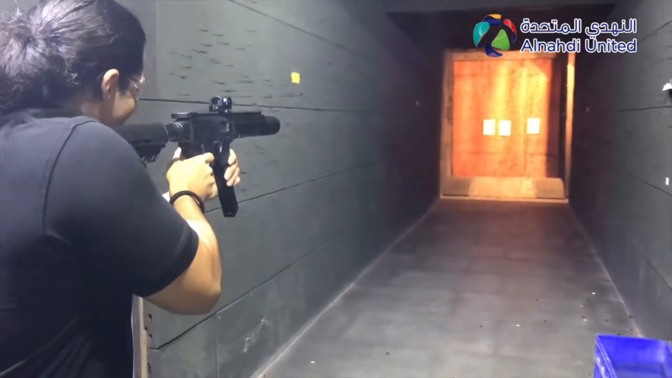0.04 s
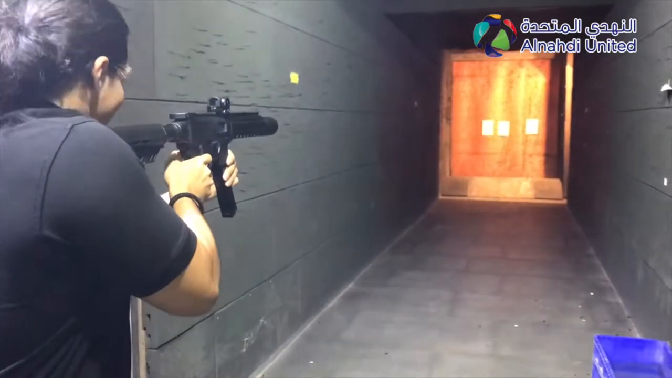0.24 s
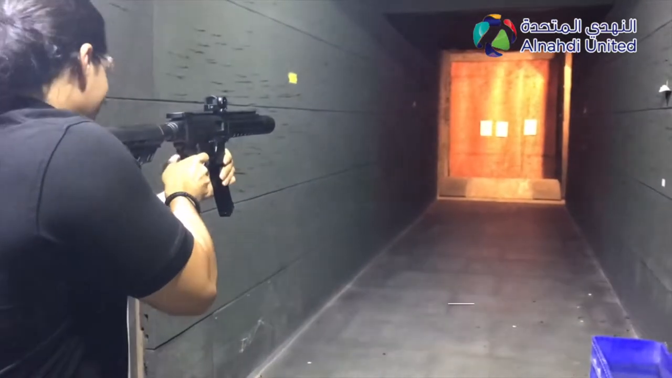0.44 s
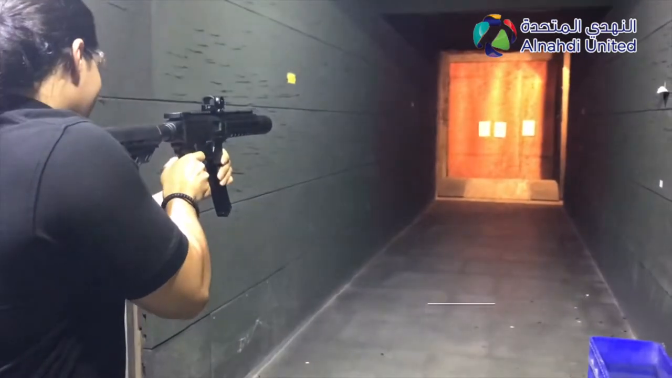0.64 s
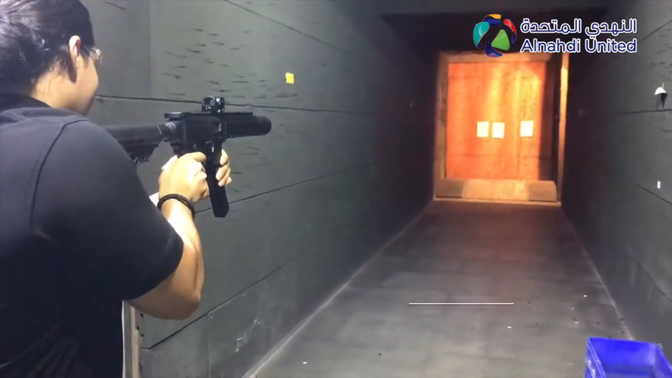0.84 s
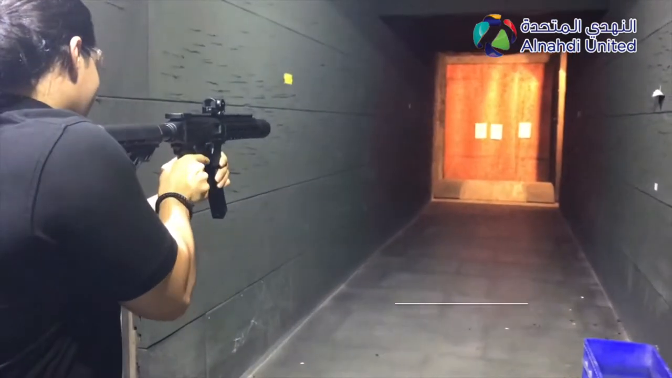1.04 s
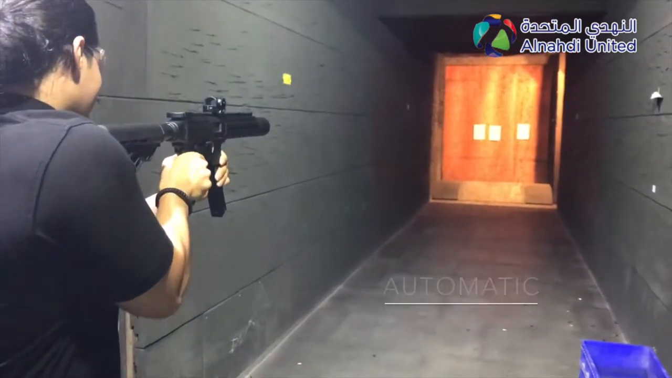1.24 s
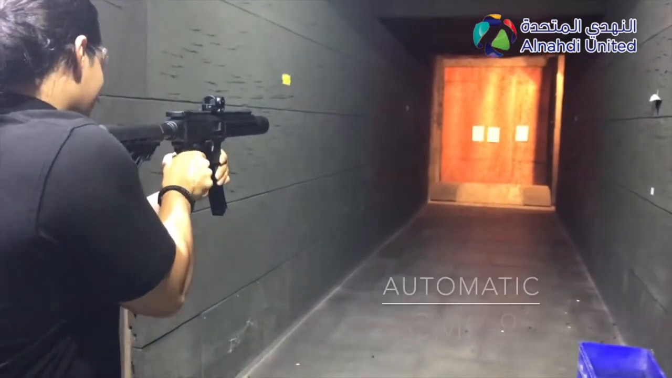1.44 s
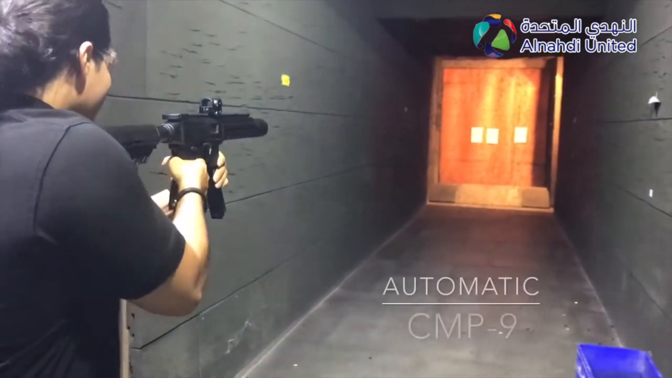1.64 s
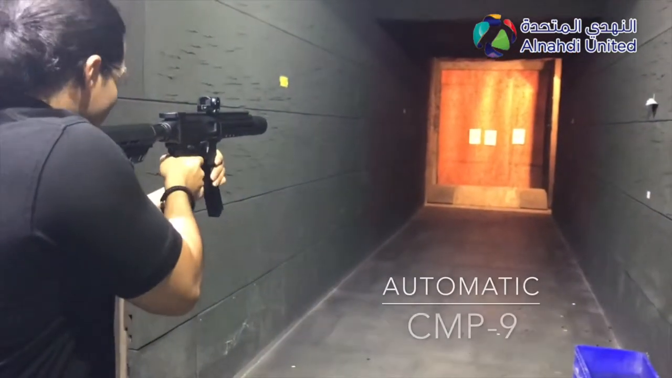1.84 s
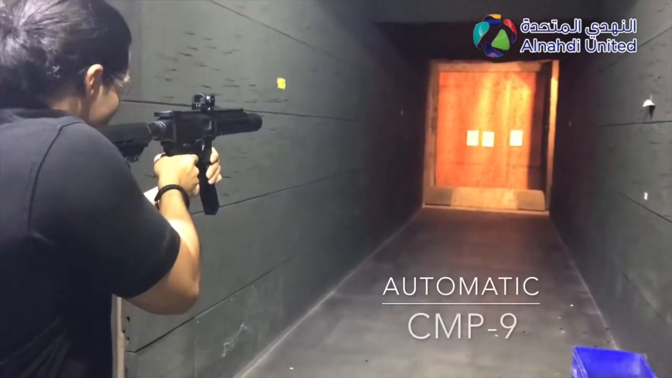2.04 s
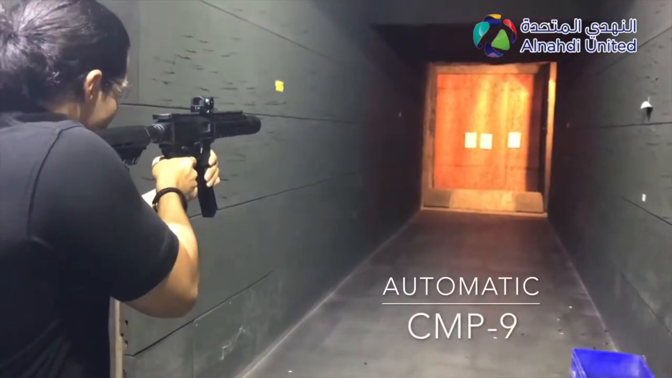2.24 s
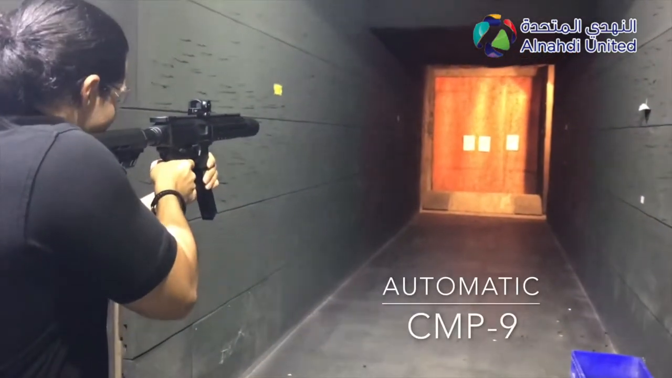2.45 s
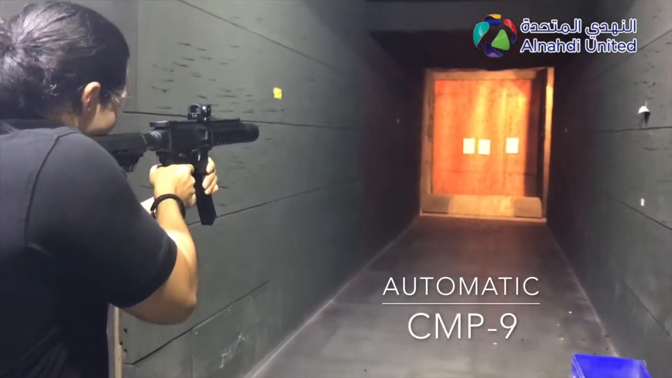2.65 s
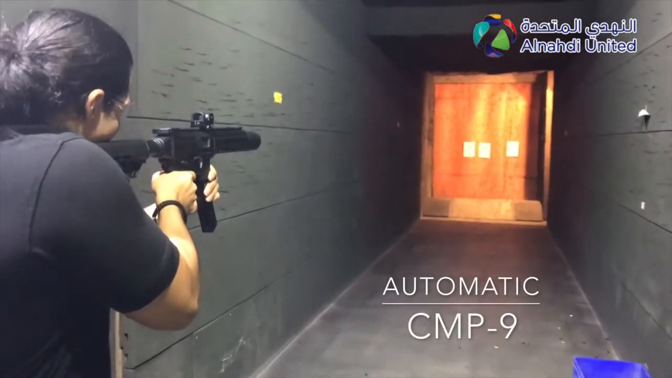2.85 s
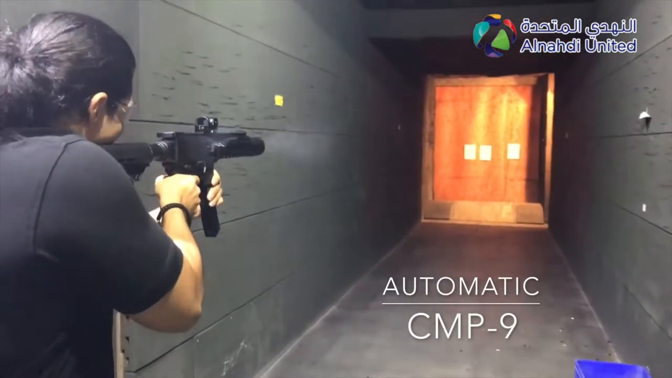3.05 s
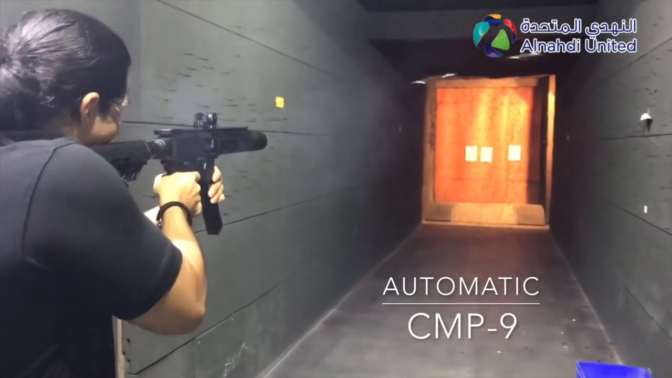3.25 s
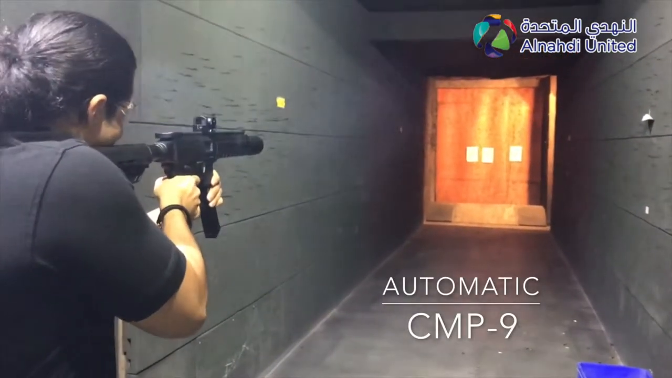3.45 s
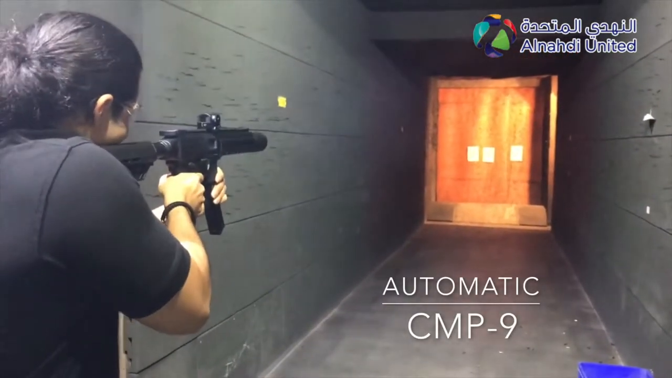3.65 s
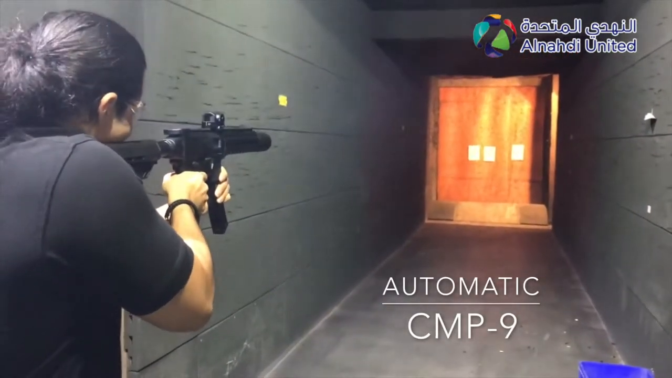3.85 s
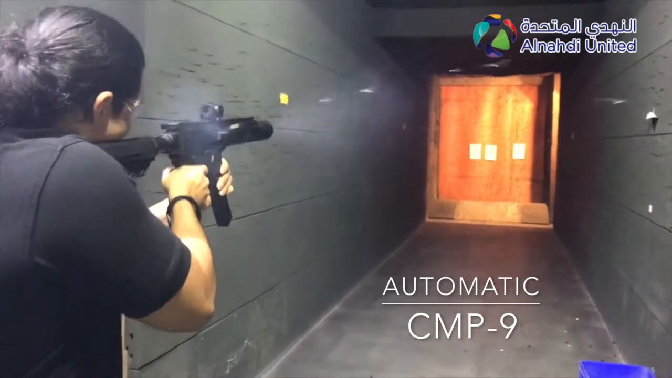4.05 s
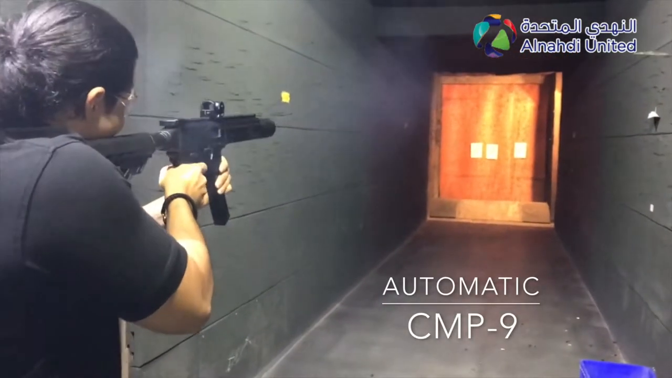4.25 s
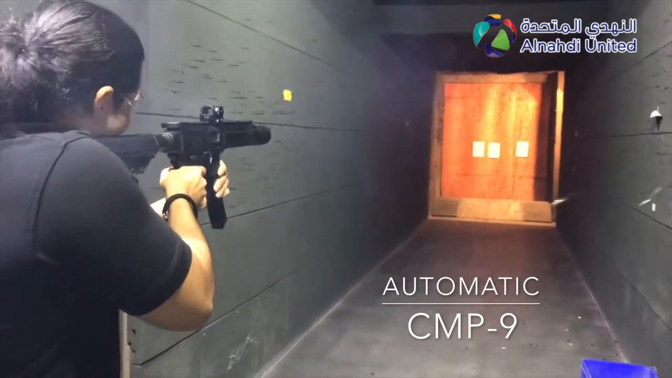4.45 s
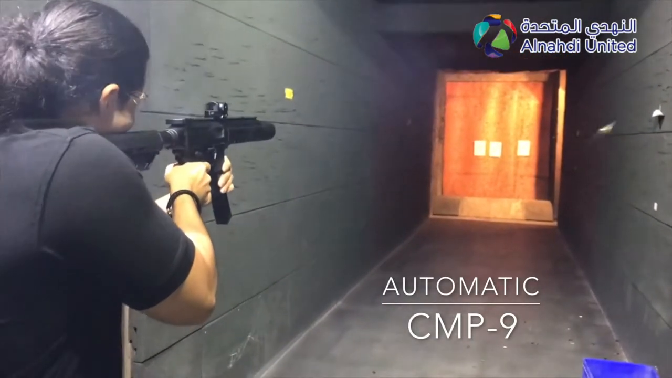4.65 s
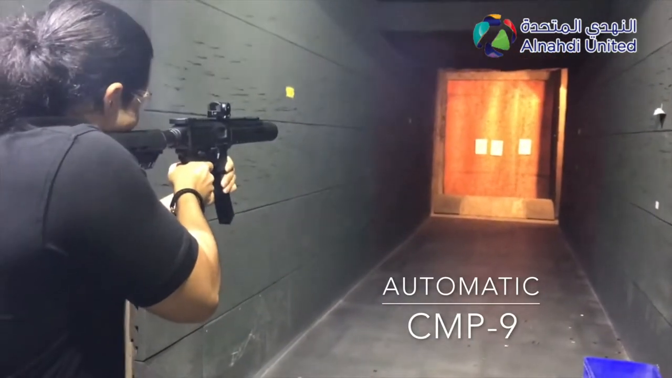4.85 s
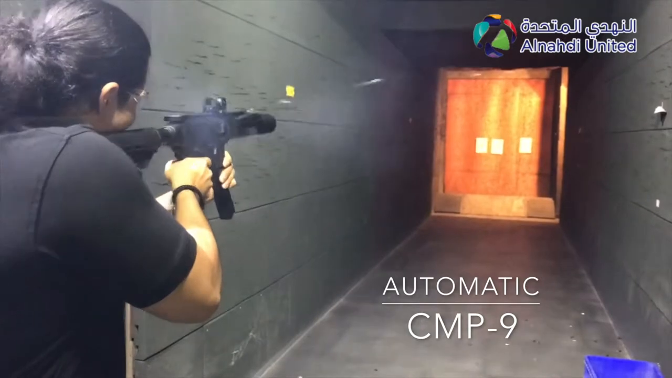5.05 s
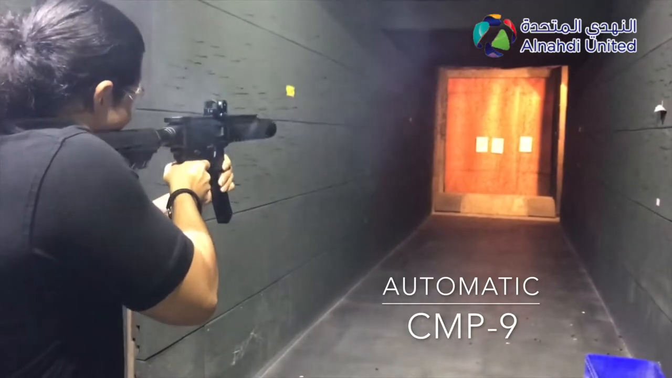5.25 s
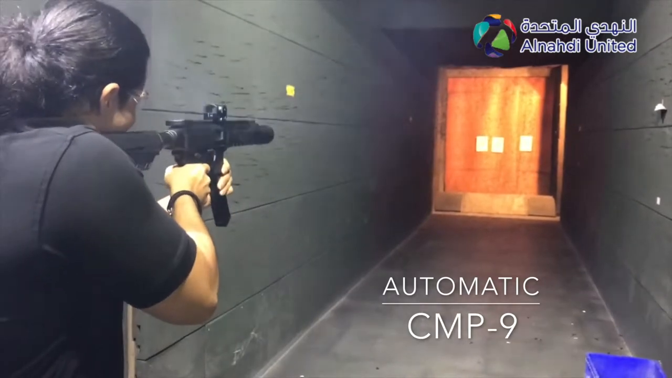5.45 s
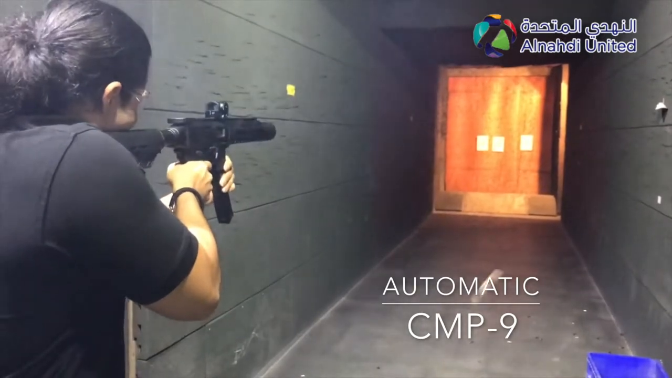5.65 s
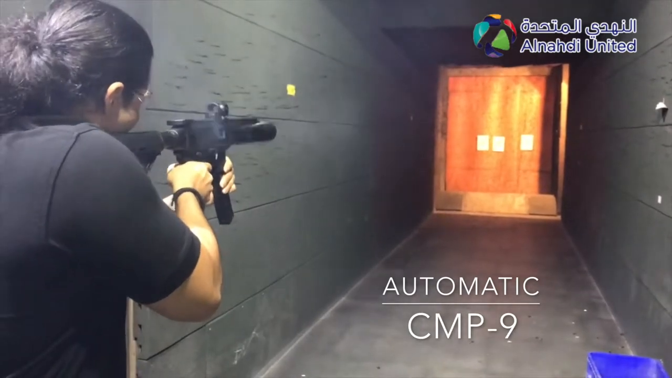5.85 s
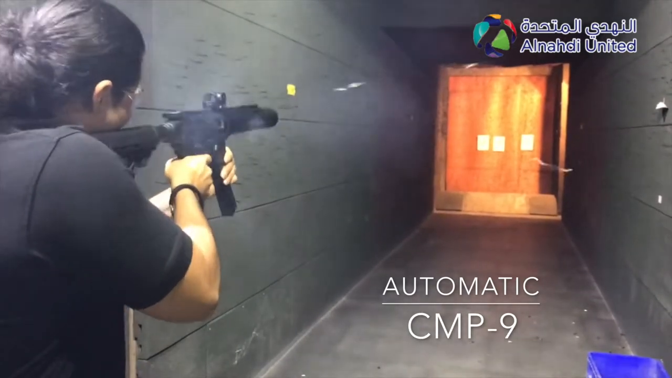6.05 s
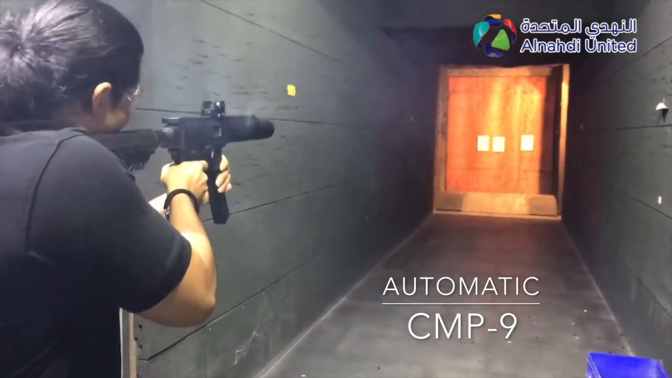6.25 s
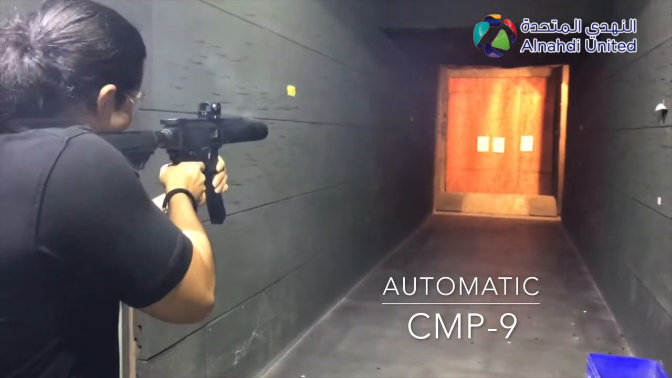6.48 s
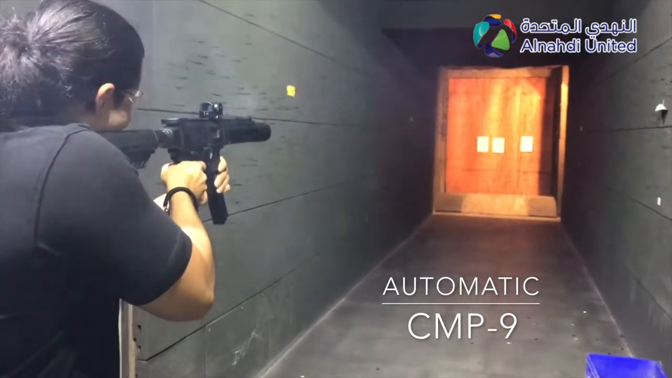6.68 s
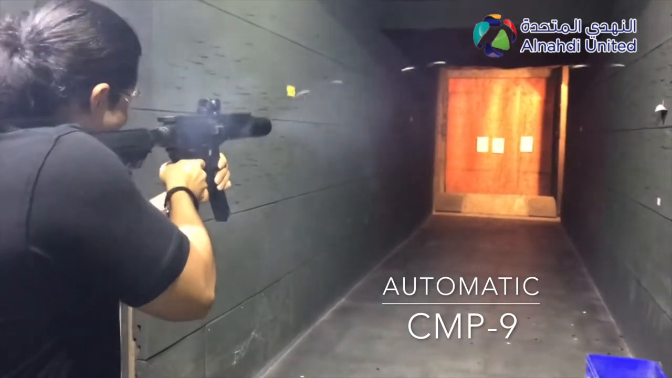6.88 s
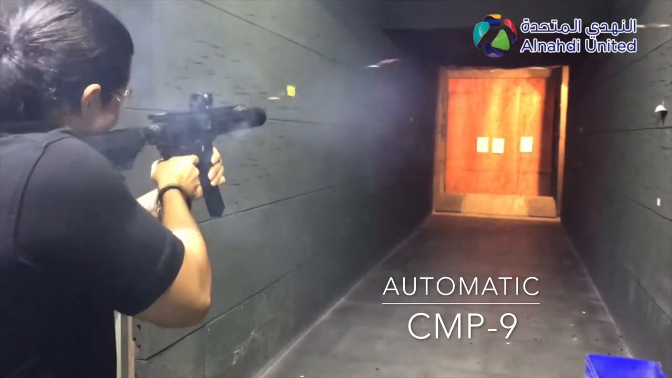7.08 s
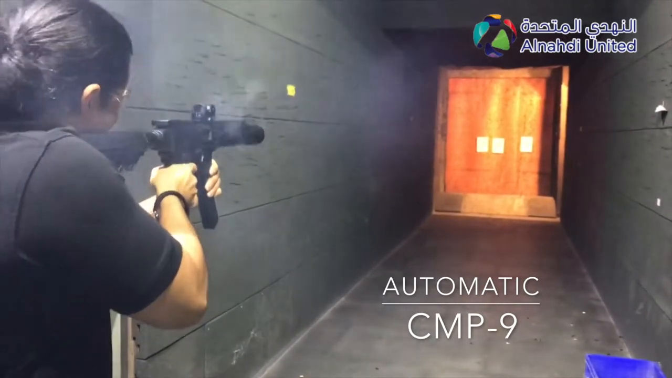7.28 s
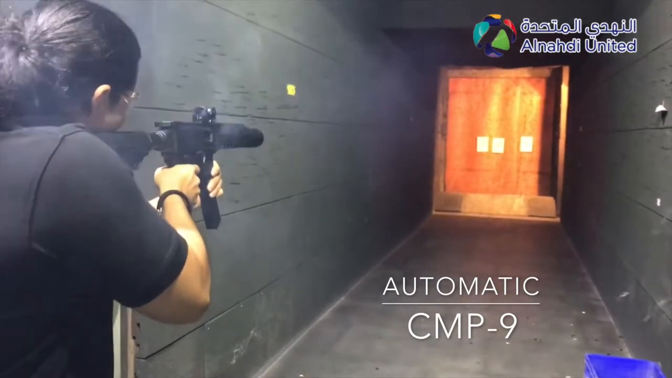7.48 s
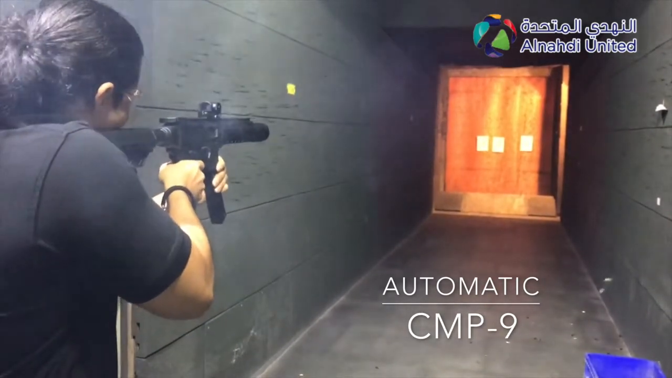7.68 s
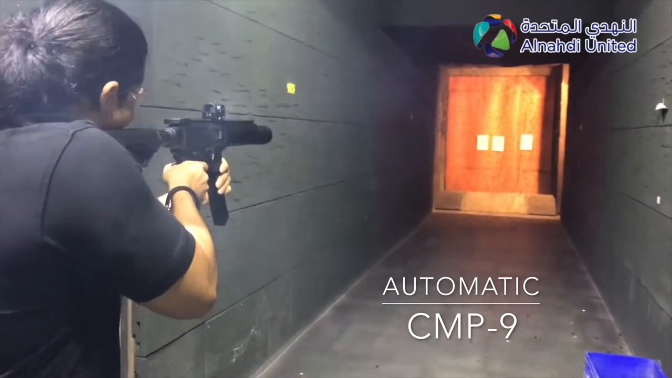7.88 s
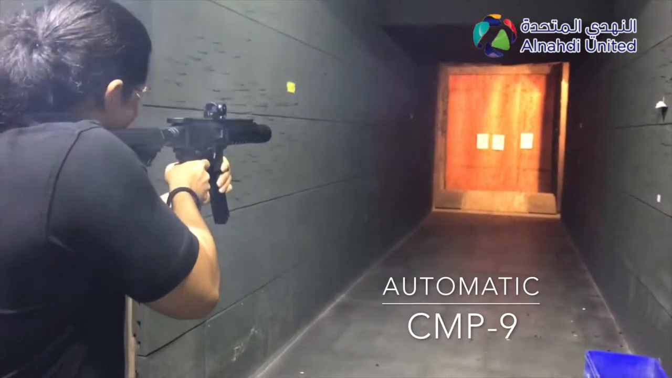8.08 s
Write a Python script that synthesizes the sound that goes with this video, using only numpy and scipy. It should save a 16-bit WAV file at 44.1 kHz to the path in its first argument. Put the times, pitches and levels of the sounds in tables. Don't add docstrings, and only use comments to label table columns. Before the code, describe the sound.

Close to the camera, a lumpy fan rumble with faint duct hiss and sparse metallic clicks. From about three seconds, a suppressed gun fires five tight bursts roughly a second apart, the last one longest. Each is crisp, hissy and mid-heavy, with short hard-walled reverberation and thin ringing metal. After every burst the ambience is ducked and slowly recovers; light handling clicks finish.

```python
import sys
import numpy as np
from scipy import signal
from scipy.fft import rfft, irfft, next_fast_len
from scipy.io import wavfile
from scipy.ndimage import map_coordinates

SR = 44100
rng = np.random.default_rng(int(sys.argv[2]) if len(sys.argv) > 2 else 0)


def ratio(d):
    e = np.asarray(d, float) / 20
    return 10 ** e


def master_out(mix):
    frames = np.transpose(np.atleast_2d(mix))
    ceiling = np.clip(frames, -1, 1)
    pcm = np.round(ceiling * 32767).astype(np.int16)
    wavfile.write(sys.argv[1], SR, pcm)


N = 358091

# start_s, crack_peak_db, body_db (re crack)
SHOTS = [
    [(3.1505, -10, -9.5), (3.2047, -11.5, -7.5), (3.2586, -13.5, -7.5)],
    [(3.989, -11.5, -9.5), (4.0424, -11.5, -11.5), (4.095, -13, -12), (4.1486, -12, -14)],
    [(5.024, -9.5, -10), (5.0806, -11, -9), (5.1359, -12, -11)],
    [(5.9337, -10, -11), (5.9907, -12, -9), (6.0436, -12, -13), (6.099, -13.5, -12.5)],
    [(6.8326, -10.5, -8), (6.888, -11.5, -9), (6.944, -12.5, -12.5), (6.996, -12.5, -13),
     (7.05, -13.5, -12), (7.1068, -11, -13.5), (7.1634, -11, -14)],
]
# start_s, peak_db, ring_db (re peak)
SNAPS = [
    (1.4036, -10, -16),
    (4.8971, -4, -12),
]


def unit(x):
    return x / np.sqrt(np.mean(x ** 2) + 1e-20)


def along(points, hz):
    f, v = np.transpose(points)
    return np.interp(np.log(hz + 1), np.log(f + 1), v)


def wobble(rate, size):
    knots = rng.standard_normal(int(size * rate / SR) + 4)
    return map_coordinates(knots, [np.arange(size) * rate / SR])


def noise(spectrum, size, peaks=(), lined_db=0):
    m = next_fast_len(size)
    hz = np.fft.rfftfreq(m, 1 / SR)
    gain = 1 + sum(ratio(db - 1) / (1 + (2 * (hz - c) / w) ** 2) for c, w, db in peaks)
    lines = np.repeat(np.clip(rng.standard_normal(len(hz)), -2, 2.6), 2)[:len(hz)]
    gain = gain * ratio(along(spectrum, hz) + lined_db * lines)
    return unit(irfft(rfft(rng.standard_normal(m)) * gain, m)[:size])


def modes(table, t):
    hz, db = np.transpose(table)[:, :, None]
    return unit(np.sum(ratio(db) * np.sin(2 * np.pi * (hz * t + rng.random(hz.shape))), axis=0))


def band(lo_hz, hi_hz):
    return [(lo_hz * .7, -35), (lo_hz, 0), (hi_hz, 0), (hi_hz * 1.3, -30)]


def add(track, s, x):
    track[round(s * SR):][:len(x)] += x[:N - round(s * SR)]


def puff(t, rise, held, t60):
    return (t > 0) * (1 - np.exp(-np.abs(t) / rise)) * ratio(-60 * np.clip(t - held, 0, None) / t60)


def tone(hz, t, flutter_db=3):
    def slow(rate):
        return np.interp(t, t[::32], wobble(rate * 32, len(t[::32])))
    return ratio(flutter_db * slow(35)) * np.sin(2 * np.pi * hz * t + .3 * slow(30))


def ducked(start_s, last_s, depth_db, fall_s, recover_s):
    t = np.arange(N) / SR
    climb = np.clip((t - last_s) / recover_s, 0, 1) ** 2.8
    return -depth_db * np.clip((t - start_s) / fall_s, 0, 1) * (1 - climb)


def gain_control():
    depths_db = [15.7, 18, 17.4, 17.6, 15.8]
    wait_s, fall_s, recover_s = .06, 0.12, 0.89
    ducks = [ducked(b[0][0] + wait_s, b[-1][0], db, fall_s, recover_s) for b, db in zip(SHOTS, depths_db)]
    ducks += [ducked(s, s, 1.5, 0.033, 0.26) for s, *_ in SNAPS]
    open_db, open_s = 7.5, 0.2
    return np.min(ducks, axis=0) - open_db * np.exp(-np.arange(N) / SR / open_s * 2)


def ventilation():
    # freq_hz, density_db_per_hz
    fan_colour = [(12, -45.5), (20, -11.5), (32, -8), (48, 3), (91, -6), (123, -2.5), (145, -7),
                  (207, -5.5), (282, -11.5), (333, -11.5), (380, -23.5), (422, -14.5), (512, -25.5),
                  (621, -22.5), (700, -29), (910, -45), (1540, -120)]
    # freq_hz, density_db_per_hz
    duct_colour = [(290, -31), (500, -20), (698, -8), (946, -3.5), (1260, -9.5), (2100, -16), (3540, -24.5),
                   (4090, -24), (4940, -29), (8700, -36.5), (10700, -42.5), (13300, -40.5), (16000, -52.5)]
    rumble_db, hiss_db = -35, -49.5
    hiss_follows = 0.92
    fan_peaks = [(56, 26, 0.0018), (118.0, 1.1, 0.0035), (220.5, 14, 0.0047), (339.0, 15, 0.0071)]
    duct_peaks = [(809, 58, 0.0), (936, 17, 0.0065), (1085, 36, 0.0064)]
    gain_db = gain_control()
    rumble = ratio(gain_db + rumble_db + 0.6 * wobble(7.5, N)) * noise(fan_colour, N, fan_peaks)
    hiss = ratio(hiss_follows * gain_db + hiss_db + 1.2 * wobble(24, N)) * noise(duct_colour, N, duct_peaks)
    return rumble + hiss


def contacts():
    # start_s, peak_db, dull_db (re peak), bright_db (re peak), ring_hz
    grip_clicks = [(0.1765, -37.5, 3, -16, 1200), (.194, -50, -6, -20, 1030), (0.928, -50, 0, -4, 4200),
                   (0.954, -42, -12, -14, 4760), (.9605, -48, -16, -16, 4800), (.968, -50, -16, -16, 4300),
                   (1.086, -55, 0, -6, 12500), (1.111, -58, 0, -6, 12000), (1.1367, -26.5, -12, 4.5, 9500),
                   (1.336, -48, 7, -13, 4500), (1.4, -31, -15, -1, 7200), (4.7715, -29, 0, 5, 4520),
                   (4.861, -56, -20, 0, 13000), (4.9666, -39, -13, -20, 2270),
                   (5.4944, -43.5, -8, -9, 4170), (5.884, -30, -2.5, -7, 5500), (6.7184, -50, 0, -25, 4000),
                   (6.7604, -38.5, 1, -5, 3200), (7.6177, -37.5, -2, -5, 4000),
                   (7.761, -35.5, -5, -6, 3050), (7.775, -52, -8, 0, 13500), (7.8345, -30, -2, -7, 4500),
                   (7.8497, -35.5, 5, -10, 3560), (7.9038, -38, 7, -11, 3000), (7.9585, -40, 3, -9, 5500),
                   (7.9824, -32, 6, -10, 5460), (7.997, -44, 8, -4, 5500), (8.0537, -24, -9, -8, 4000),
                   (8.0575, -34, -8, 0, 7900), (8.07, -40, 0, 1, 6000)]
    # ahead_of_first_shot_s, peak_db, dull_db, bright_db, t60_s
    trigger_steps = [
        (0.02, -34, -1.5, -0.5, 0.06),
        (0.009, -21.5, -8, -3.5, 0.046),
    ]
    # freq_hz, density_db_per_hz
    tick_colour = [(1500, -30), (2800, -2), (5500, -4), (8000, -14.5), (12000, -31)]
    # freq_hz, density_db_per_hz
    bright_colour = [(5000, -35), (7500, 0), (11500, 0), (14000, -5), (16000, -9)]
    # freq_hz, density_db_per_hz
    room_colour = [(500, -25), (1200, -1), (4000, -5.5), (7000, -13), (12000, -28)]
    click_t60_s, sear_hz = 0.02, 8900
    out, t = np.zeros(N), np.arange(SR // 3) / SR
    ticks = [(*row, click_t60_s) for row in grip_clicks]
    for burst in SHOTS:
        for ahead_s, db, dull_db, bright_db, t60 in trigger_steps:
            ticks.append((burst[0][0] - ahead_s, db, dull_db, bright_db, sear_hz, t60))
    for s, db, dull_db, bright_db, hz, t60 in ticks:
        tick = np.sin(2 * np.pi * hz * t) + ratio(-4.5) * noise(band(0.76 * hz, 1.3 * hz), len(t))
        tick += ratio(-2) * noise(tick_colour, len(t)) + ratio(dull_db) * noise(band(730, 2300), len(t))
        bright = ratio(bright_db) * noise(bright_colour, len(t))
        fall = puff(t, 0.00013, 0, t60) + ratio(-3.0) * puff(t, .0001, 0.00052, 0.0081)
        room = ratio(-10) * puff(t, 0.0027, 0, 0.2) * noise(room_colour, len(t))
        room += ratio(-7) * puff(t, 0.0042, 0, .08) * (bright + ratio(-6.5) * tick)
        add(out, s - .0005, ratio(db - 13.0) * (fall * (tick + bright) + room))
    return out


def spring():
    # start_s, level_db, t60_s
    twangs = [(0.954, -48, 0.23), (1.141, -61, .3), (1.29, -71, .5), (1.338, -65, 0.42), (4.91, -72, 0.28),
              (5.49, -60.5, 0.32), (5.81, -74.5, 0.61), (6.76, -68, .4), (7.617, -57, 0.29),
              (7.765, -57, 0.19), (7.837, -51, 0.18), (7.847, -48, 0.1), (7.905, -60, .3), (8.057, -56, .2),
              (8.075, -38.5, 0.11)]
    colour = [(10450, -54.0), (10740, -4.5), (10870, 11.5), (11000, 0), (11250, -41.0)]
    out, t = np.zeros(N), np.arange(SR // 3) / SR
    for s, db, t60 in twangs:
        add(out, s, ratio(db) * puff(t, 0.0022, 0.0074, t60) * noise(colour, len(t)))
    return out


def selector():
    # freq_hz, density_db_per_hz
    detent_colours = [
        [(470, -37), (800, -19), (1210, -22), (1540, -19), (2770, -22), (3560, -13), (4180, 3.5), (5110, -8),
         (7640, -7), (8550, -3), (9940, -8.5), (14800, -6.5), (16000, -18)],
        [(470, -52), (800, -27.5), (1150, -9.5), (1500, -35), (2000, -9.5), (2470, -18.5), (2700, -10),
         (4510, -4.5), (4930, -11.5), (6490, -10.5), (10600, -18.5), (12000, -17), (16000, -37.5)],
    ]
    # later_s, level_db (re peak)
    rebound_sets = [
        [(.0045, -1), (.012, -20)],
        [(.0055, -4), (.0135, -11.5)],
    ]
    # freq_hz, level_db, t60_s
    lever_modes = [
        [(3620, -22, 0.15), (4180, 0, 0.067), (7300, -12, 0.069), (8516, 2, 0.038), (9340, -28, 0.2),
         (11000, -16, 0.079), (11150, -15, 0.074), (12490, -10, 0.059), (14100, -15, 0.13), (14640, -12, 0.081)],
        [(2700, -11.5, 0.065), (3520, -7, 0.075), (3870, 0, 0.057), (4320, 0, 0.072), (4716, -8, 0.085),
         (6228, -17, 0.092), (6982, -30, 0.36), (8882, -20, 0.097), (10770, -28, 0.23), (11710, -35.5, 0.18)],
    ]
    spike_s = .00004
    out, t = np.zeros(N), np.arange(SR // 3) / SR
    for (s, db, ring_db), colour, rebounds, lever in zip(SNAPS, detent_colours, rebound_sets, lever_modes):
        snap = ratio(5.5) * puff(t, 0.00016, 0.0013, 0.0044)
        snap += sum(ratio(level_db) * puff(t - later_s, .0002, 0.001, 0.015) for later_s, level_db in rebounds)
        snap += ratio(-8.5) * puff(t, .002, 0.0043, 0.059) + ratio(-21.5) * puff(t, .004, 0, 0.26)
        ring = np.zeros(len(t))
        for hz, level_db, t60 in lever:
            phase = 2 * np.pi * hz * t + .8 * wobble(120, len(t))
            ring += ratio(level_db) * puff(t, .0015, .006, 1.5 * t60) * np.cos(phase)
        add(out, s - .0006, ratio(db - 14.5) * (snap * noise(colour, len(t)) + ratio(ring_db + 4.5) * ring))
        add(out, s, -ratio(db - 4.5) * (1 - t / spike_s) * np.exp(-t / spike_s))
    return out


def belt():
    # start_s, peak_db, pitch_hz
    chirp_events = [(1.981, -59, 3900), (2.07, -59, 3480), (2.15, -58, 4000), (2.24, -58, 3400),
                    (2.33, -62, 3800), (2.41, -59, 3880), (2.41, -65.5, 6800), (2.445, -70, 8800),
                    (2.501, -61, 3920), (2.5, -64, 6900), (2.53, -70, 8200), (2.7, -69, 8200),
                    (2.87, -73, 8400), (3.04, -70, 8100)]
    out, t = np.zeros(N), np.arange(SR // 10) / SR
    for s, db, hz in chirp_events:
        chirp = puff(t, 0.0043, 0.024, 0.08) * noise(band(hz * 0.44, hz * 1.08), len(t))
        add(out, s - .012, ratio(db) * chirp)
    return out


def pings():
    # start_s, level_db, pitch_hz, t60_s
    ping_events = [(4.24, -30, 1975, .06), (4.285, -40, 1950, .05), (5.22, -42, 1500, .15),
                   (6.2, -43, 1846, .25), (7.25, -39, 1981, .08), (7.29, -45, 2046, .25),
                   (3.42, -62, 410, 2.5), (4.24, -63, 410, 5), (5.33, -53, 410, .5), (6.36, -67, 410, 3),
                   (7.3, -62, 410, 2), (4.5, -59, 1157, .3), (6.4, -61, 1160, .3), (6.2, -38, 1950, .08),
                   (6.235, -41, 2100, .1), (7.335, -42, 2708, .55), (7.29, -39, 3806, .52),
                   (3.47, -54, 1170, .7), (2.2, -58, 950, .3), (2.58, -55, 950, .2), (5.29, -48, 2340, .12),
                   (7.77, -74, 13500, .5), (7.77, -79, 14300, .3), (6.19, -40, 1500, .08),
                   (6.075, -32, 1600, .05), (6.42, -74, 7881, 3)]
    out, t = np.zeros(N), np.arange(SR * 3 // 4) / SR
    for s, db, hz, t60 in ping_events:
        add(out, s, ratio(db) * puff(t, min(.015, t60 / 15), .035, t60) * (t < .55) * tone(hz, t, 1.5))
    return out


def gas_crack(t, t60, held_s, spike_db):
    # freq_hz, density_db_per_hz
    crack_colour = [(880, -28.5), (1500, -2.5), (2270, -7), (3000, -2), (4120, -6), (6000, -4.5),
                    (8400, -5), (10700, -9.5), (14600, -6), (16000, -16.5)]
    crack = puff(t, 0.0017, held_s, t60) * ratio(1.5 - 2.5 * np.clip(t / held_s, 0, 1))
    crack += ratio(spike_db) * puff(t, .0001, 0.00052, 0.0033)
    crack += ratio(-19.5) * puff(t - 0.038, 0.0023, 0.012, 0.09)
    jet = puff(t - .0008, 0.00035, .004, .02) * noise(band(2800, 6500), len(t))
    return crack * noise(crack_colour, len(t)) + ratio(-6) * jet


def gun_body(t, t60, held_s, mid):
    # freq_hz, density_db_per_hz
    body_colour = [(180, -29), (300, -5.5), (587, -6), (655, -1), (796, -8), (887, -3), (967, -2),
                   (1140, 0.5), (1230, 0.5), (4000, -8), (5200, -39.5), (8800, -120)]
    # freq_hz, width_hz, level_db
    wall_peaks = [(650, 12, -2.5), (860, 540, -0.5), (2440, 40, -2.5), (3060, 70, -5.5), (3500, 140, 6)]
    body = puff(t, 0.0063, held_s + 0.011, 0.8 * t60)
    body += ratio(-8.5) * puff(t - 0.038, 0.0013, 0.004, 0.16)
    body += ratio(-0.5) * puff(t - .0115, 0.0021, 0.0014, .012)
    return body * (ratio(-1) * noise(body_colour, len(t), wall_peaks) + ratio(-3.5) * mid)


def low_push(t, low):
    # freq_hz, density_db_per_hz
    thump_colour = [(24, -36), (40, 2.5), (91, -10.5), (155, -1), (231, -7), (445, -13.5), (500, -6.5),
                    (650, -36), (1100, -120)]
    push = puff(t, 0.00069, 0.0082, 0.085) + ratio(-2.5) * puff(t - .0195, 0.0014, 0.011, 0.084)
    push += ratio(-19.5) * puff(t, .02, 0.032, 0.19)
    return push * (ratio(-4) * noise(thump_colour, len(t)) + ratio(-2) * low)


def bolt_clack(t):
    return ratio(-11) * puff(t - 0.055, .0007, .002, 0.023) * noise(band(1200, 2400), len(t))


def lane(size, uneven):
    # freq_hz, density_db_per_hz
    lane_colour = [(59, -34), (100, 0.5), (215, -16), (452, -10), (818, -2), (1230, -1.5), (2040, -4.5),
                   (2690, -8), (3940, -6), (5000, -5.5), (6300, -11), (13500, -18.5), (16000, -31)]
    # freq_hz, t60_s
    lane_t60 = [(150, 0.21), (1200, 0.6), (1800, 0.46), (2300, 0.6), (3700, 0.5), (4200, .56), (5000, 0.42),
                (6200, 0.71), (7000, 0.58), (14000, 0.7)]
    # freq_hz, width_hz, level_db
    lane_peaks = [(650, 43, -6), (1190, 53, -5.5), (1590, 95, 0.5), (2180, 230, 0), (3720, 250, -5)]
    hz, t, z = signal.stft(noise(lane_colour, size, lane_peaks, lined_db=10.5), SR, nperseg=256)
    decay = ratio(-60 * (t - .1) / (along(lane_t60, hz) * uneven)[:, None])
    return signal.istft(z * decay, SR, nperseg=256)[1][:size]


def back_stop(out, s, slap_db):
    # freq_hz, density_db_per_hz
    slap_colour = [(880, -29), (1500, -7), (4000, 3), (9000, -5), (16000, -11)]
    t, slap_s = np.arange(SR // 4) / SR, .0795
    slap = puff(t, 0.0006, 0.0031, 0.027) * noise(slap_colour, len(t))
    dull = puff(t, 0.0008, 0.004, 0.037) * noise(band(1000, 2200), len(t))
    add(out, s + slap_s - .0003, ratio(slap_db - 23.5) * slap)
    add(out, s + slap_s - .007, ratio(-24.5) * dull)


def gun():
    # freq_hz, level_db
    low_modes = [(128, -1), (161, -1), (193, -1.5), (247, -5), (301, -6), (333, -4), (420, -2)]
    # freq_hz, level_db
    mid_modes = [(480, -1.5), (554, -2.5), (632, 0.5), (664, 1), (861, -2.5), (903, -1), (963, -2.5),
                 (1122, -0.5), (1163, -6.5), (1310, -1.5), (1385, -6.5), (1472, -11.5), (1602, -5.5),
                 (1934, -1)]
    # freq_hz, level_db
    receiver_modes = [(1705, -0.5), (1787, -4.5), (2995, -3), (3160, -9), (3440, -3.5), (3572, 0)]
    # crack_linger_factor, lane_db, slap_db
    burst_rooms = [(1.8, 0, -3.5), (1.02, -2.3, 0), (1.32, 0.057, -4), (0.96, 0, -3.5), (0.88, 1, -0.5)]
    first, second, later = (0.17, 0.0064, -14, 2), (0.0531, 0.016, -22, -7), (0.08, 0.0145, -16, 3.5)
    steepen_s, steepen_db_per_s = 0.19, 18.5
    out, short, long = np.zeros(N), np.arange(SR // 4) / SR, np.arange(SR * 3 // 4) / SR
    low = modes(low_modes, short)
    mid = modes(mid_modes, short) + ratio(-5.5) * modes(receiver_modes, short)
    for burst, (linger, room_db, slap_db) in zip(SHOTS, burst_rooms):
        uneven = np.exp(.13 * rng.standard_normal(129))
        settings = [first, second] + [later] * len(burst)
        for (s, db, body_db), (t60, held_s, lane_db, spike_db) in zip(burst, settings):
            t60 = t60 * linger
            ragged = ratio(1.2 * wobble(350, len(short)))
            shot = gas_crack(short, t60, held_s, spike_db) + bolt_clack(short)
            shot += ratio(body_db + 5.5) * gun_body(short, t60, held_s, mid)
            shot += ratio(body_db - 1.5) * low_push(short, low)
            add(out, s - .0002, ratio(db - 5.5) * ragged * shot)
            tail_db = db + lane_db + room_db - 4.5 - steepen_db_per_s * np.clip(long - steepen_s, 0, None)
            add(out, s, ratio(tail_db) * (1 - np.exp(-long / 0.06)) * lane(len(long), uneven))
        back_stop(out, s, slap_db)
        add(out, s, ratio(-45.5) * puff(long, 0.022, 0.049, 0.99) * noise(band(40, 180), len(long)))
    return out


def swarm(db):
    # freq_hz, level_db
    swarm_colour = [(900, -4.5), (2200, 0.5), (3700, -1), (4300, -5), (4900, -13.5), (6300, -2),
                    (7300, -8.5), (14500, -15)]
    place, loud, life = rng.random((28, 3)).T
    pitch_hz = 1000 + 13500 * place ** 1.6
    t60_s = np.interp(life ** 2, [0, 1], (0.33, 2.5))
    return list(zip(pitch_hz, db / 2 - 36.5 + along(swarm_colour, pitch_hz) + 5 * loud - 6 * t60_s, t60_s))


def ringing():
    # start_s, level_db
    steel_events = [
        (3.42, -58),
        (4.42, -73),
        (5.36, -62),
        (6.331, -65.5),
        (7.36, -77),
    ]
    # freq_hz, level_db, t60_s
    steel_partials = [(1152, 0, 1.8), (2180, -2, .65), (3569, -10, .9), (5814, -14, 1.1), (7176, -18, 1.3),
                      (7881, -16, 1.6), (8947, -10, .55), (11070, -6, 1), (12130, -13, .77),
                      (12690, -15, .7), (13460, -10, 1), (14750, -15, .45)]
    # freq_hz, level_db, t60_s
    brass_sets = [
        [(2331, -49, .6), (11070, -62, .9), (5814, -64, .9), (3600, -58, .7), (2756, -62, 1.3),
         (3424, -63, 1.4), (3704, -52, 1.05), (2180, -58, .75), (1152, -62, .8), (4081, -55.5, .45),
         (6002, -61, 1), (7176, -69, 1.5), (7881, -70, 1.6), (8430, -64.5, .8)],
        [(409, -66, 5), (3569, -68, 1.2), (3500, -68, .7), (3900, -66, .6), (6750, -66, .4), (4091, -65, .55),
         (6395, -66, .3), (5426, -68, .3), (7881, -77, 2), (6228, -70, .3), (8511, -78, .55), (11090, -66, .7),
         (12120, -75, .9), (13470, -75, .9), (14010, -76, .45), (12700, -79, .55), (7176, -73, .55)],
        [(3590, -65, 1.4), (3690, -67, .9), (4274, -58, .37), (4484, -59, .33), (2186, -56, .5),
         (1168, -56, .4), (11130, -60, .45), (6611, -56, .4), (9550, -64, .7), (9706, -57, .34),
         (12420, -64, 1.3)],
        [(1227, -60.5, .78), (3047, -66.5, .45), (3424, -73, 1.8), (6002, -76, 1.2), (6799, -72.5, .7),
         (7881, -63, .8), (8947, -64, .65), (11060, -72, 1.4), (13470, -75, 1)],
        [(1260, -52.5, .34), (10720, -63, .5), (14070, -70, .8), (4086, -58, .45), (4565, -56.5, .29),
         (5728, -58, .7), (9609, -58.5, .39), (13100, -64, .4)],
    ]
    out, lead_s = np.zeros(N), .13
    t = np.arange(SR * 3 // 4) / SR
    for (s, db), cases in zip(steel_events, brass_sets):
        struck = [(hz, db + level_db + 2.5 * rng.standard_normal(), t60) for hz, level_db, t60 in steel_partials]
        for hz, level_db, t60 in struck + swarm(db) + cases:
            fall = ratio(level_db + (12.5 - 60 / t60) * (t - lead_s))
            add(out, s - lead_s, fall * np.clip(t / lead_s, 0, 1) ** 2 * tone(hz, t))
    return out


def scene():
    hands = contacts() + spring() + selector()
    return (ventilation() + hands + belt() + pings() + gun() + ringing())[None]


def band_limit(x):
    return signal.sosfilt(signal.butter(12, 16810, fs=SR, output="sos"), x)


def record(dry):
    soft = dry / (1 + np.abs(dry / .6) ** 4) ** (1 / 4)
    m = next_fast_len(N)
    response_db = along([(18, -20), (40, 0), (15900, 0), (16800, -60)], np.fft.rfftfreq(m, 1 / SR))
    cut = irfft(rfft(soft, m) * ratio(response_db), m)[:, :N]
    return band_limit(cut)


dry = scene()
out = record(dry)
master_out(out)
```